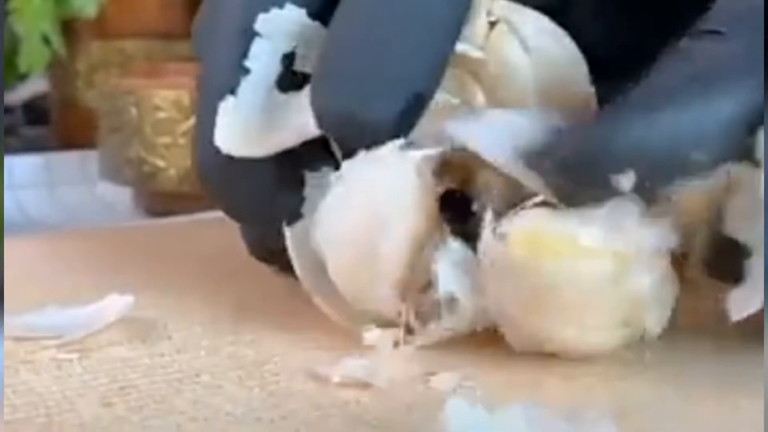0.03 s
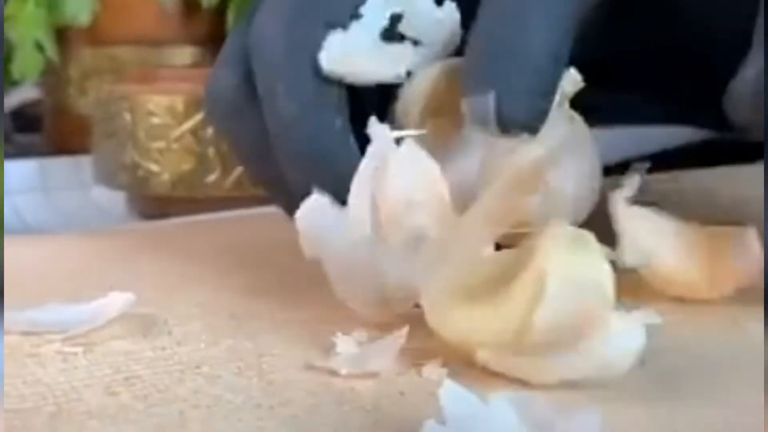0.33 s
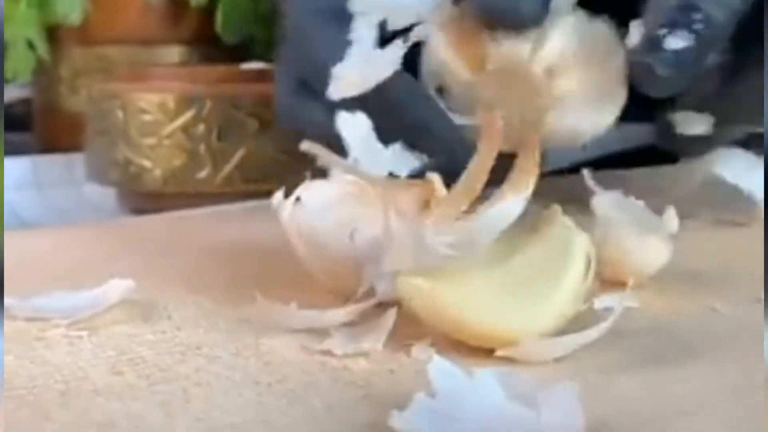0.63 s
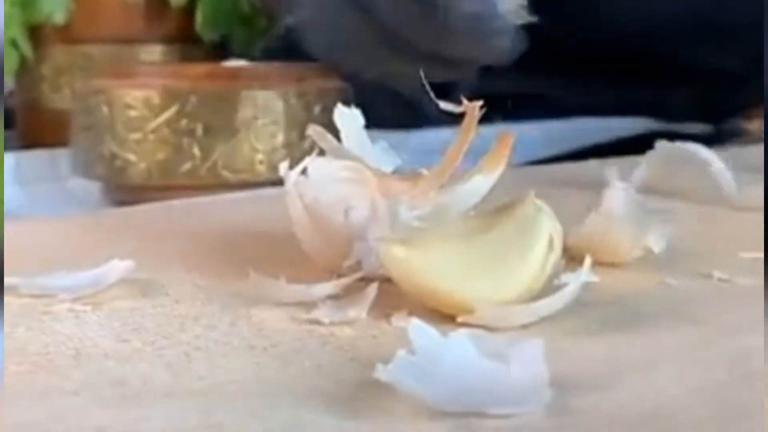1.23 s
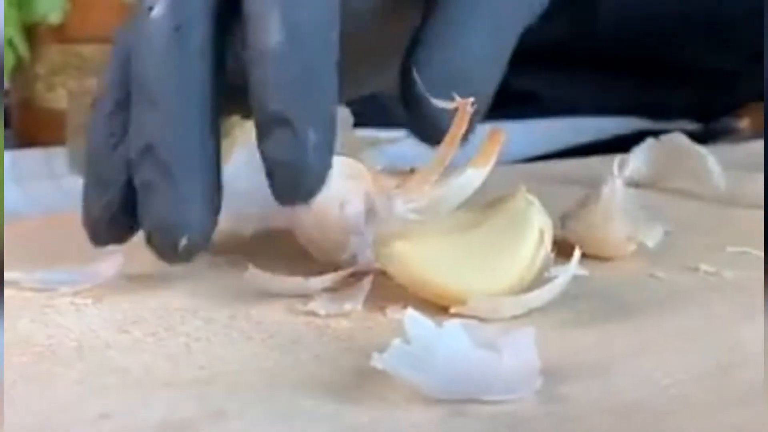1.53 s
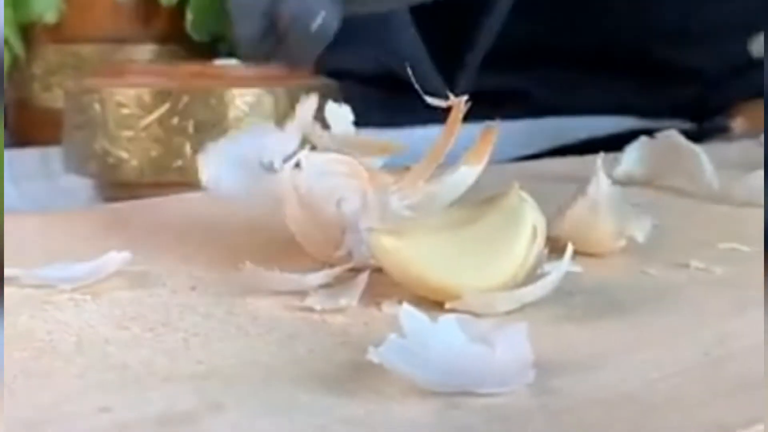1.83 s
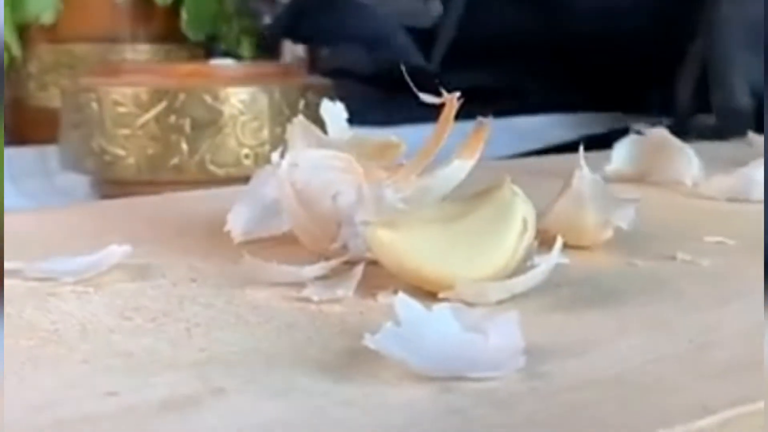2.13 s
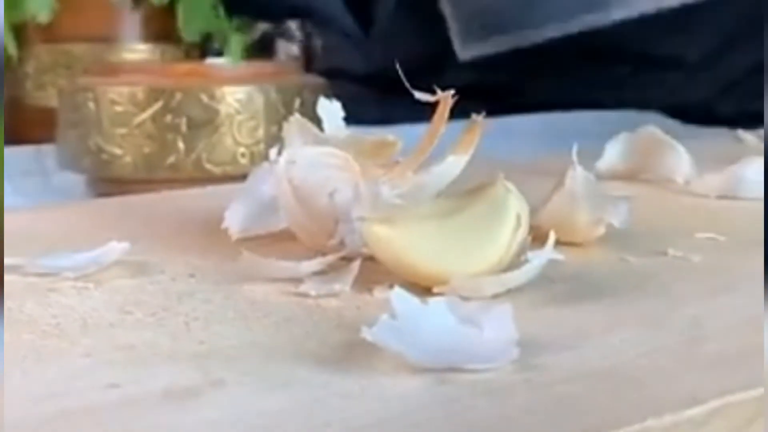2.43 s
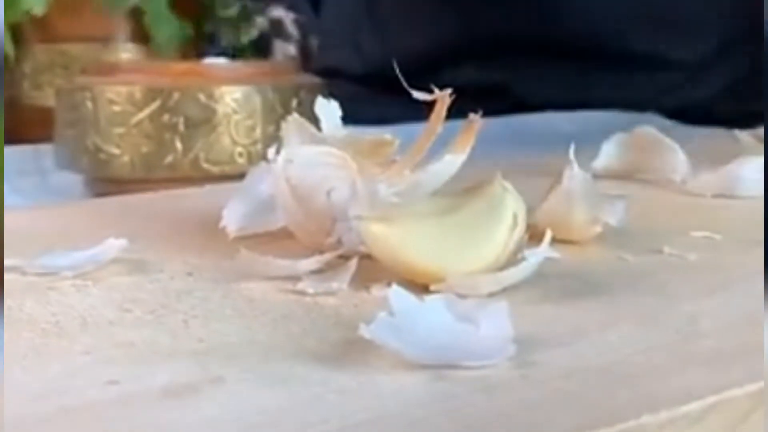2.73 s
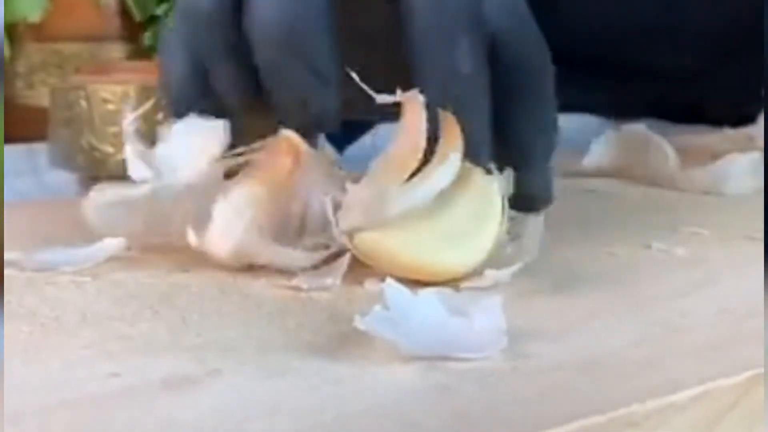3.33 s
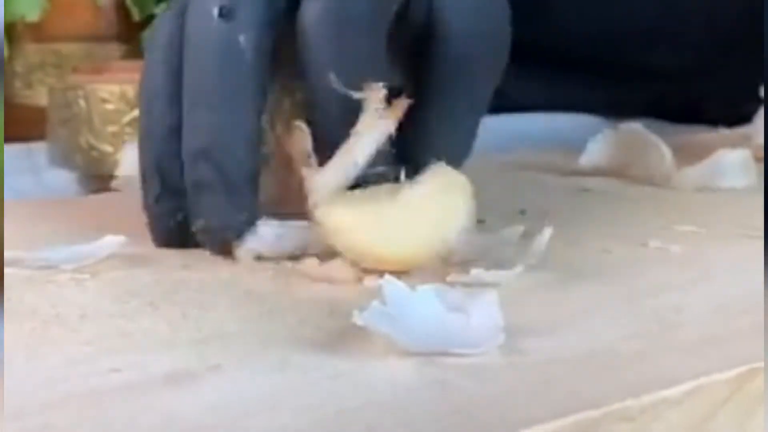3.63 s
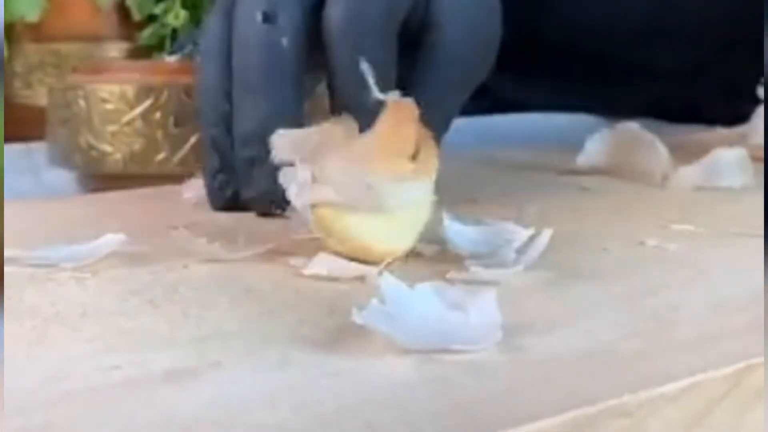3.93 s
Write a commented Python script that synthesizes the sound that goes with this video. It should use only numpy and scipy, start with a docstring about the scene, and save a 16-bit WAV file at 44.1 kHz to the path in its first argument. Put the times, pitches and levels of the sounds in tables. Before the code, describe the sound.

Dry garlic skins crinkle, scrape and crack close up as gloved hands pull cloves apart for the first 1.2 seconds. A clove knocks on the wooden board around 0.25 seconds, among soft hand bumps. Faint rustles follow, with two light taps at about 2.2 and 2.5 seconds. Crinkling returns from 3.2 seconds, peaking near 3.8 with sharp snaps and a soft bump. Low rumble and electrical hum continue throughout.

```python
"""Kitchen, close to a wooden board: gloved hands pull garlic cloves apart.
Each finger move crinkles and scrapes the dry skins; now and then a skin cracks and its flake rings.
The hands bump the board, a loose clove knocks on it and two light taps follow.
Low rumble and mains hum run underneath."""
import sys
import numpy as np
from scipy import signal
from scipy.fft import rfft, irfft, next_fast_len
from scipy.io import wavfile
from scipy.ndimage import map_coordinates

SR = 44100
rng = np.random.default_rng(int(sys.argv[2]) if len(sys.argv) > 2 else 0)


def int16_out(signal):
    """Quantize to a 16-bit WAV file."""
    q = np.round(np.clip(np.atleast_2d(signal).T, -1, 1) * 32767)
    wavfile.write(sys.argv[1], SR, q.astype(np.int16))


N = 176400


def rustle():
    """Each finger move swells and fades, crinkling the skins and scraping glove on clove."""
    # finger moves: centre t/s, length/s, crinkle level/dB, scrape level/dB, treble lift/dB
    moves = [(.008, 0.032, -40, -41, 5.5), (0.066, 0.034, -38.5, -45.5, -5), (0.154, 0.15, -45, -50, 4.5),
             (0.201, 0.023, -41, -49, 1), (0.214, 0.015, -46, -41.5, 1), (0.261, 0.028, -39.5, -41.5, 5),
             (0.288, 0.018, -37, -44, 4), (0.339, 0.055, -39, -42.5, 4), (0.387, 0.035, -36, -46, -1),
             (0.455, .022, -38, -41, 4), (0.477, 0.04, -40, -58, -4), (0.536, 0.036, -42, -49.5, 1),
             (0.639, 0.06, -49.5, -52.5, 5), (0.749, 0.029, -44, -57, -5), (0.795, 0.017, -42.5, -59, 3),
             (0.827, 0.0062, -44, -51, 0), (0.875, 0.018, -28.5, -52, 8.5), (0.938, 0.05, -36, -44.5, 3),
             (1.006, 0.031, -38, -50, 7.5), (1.067, 0.031, -36.5, -54, 3), (1.132, 0.043, -49.5, -67, -1),
             (1.23, 0.079, -55, -58.5, 2), (1.418, 0.04, -52.5, -66, -4), (1.493, 0.022, -43, -54, -8),
             (1.576, 0.023, -62, -67, -3), (1.615, 0.021, -55, -61, -2), (1.933, 0.18, -62.5, -61, -2),
             (2.14, 0.069, -54.5, -60, -9), (2.745, 0.062, -50, -71, -5), (3.214, 0.046, -45, -54, -1),
             (3.322, 0.059, -38.5, -50, 5.5), (3.47, 0.036, -53.5, -58, 8), (3.53, 0.11, -48.5, -68, -4),
             (3.656, 0.021, -35.5, -46.5, 3), (3.699, 0.019, -36, -56, 1), (3.725, 0.026, -31, -45.5, 2),
             (3.744, .008, -39, -36, 0), (3.753, 0.019, -30.5, -39, 0), (3.78, 0.0095, -32.5, -50, -1),
             (3.802, 0.0071, -33.5, -39.5, 6), (3.838, 0.05, -39, -51, 5.5), (3.894, 0.028, -38.5, -55, 2),
             (3.998, 0.071, -37, -50, -5)]
    # dry skin spectrum: f/Hz, density/dB
    skin_spectrum = [(1000, -26), (2100, -9.5), (2700, -9.5), (3500, -9), (4200, -5), (5300, -3),
                     (6400, -1), (8400, 0.5), (9600, 3.5), (10600, 2), (11600, -4), (13000, -2),
                     (15200, -2.5), (16500, 6)]
    # scrape spectrum: f/Hz, density/dB
    scrape_spectrum = [(250, -4), (700, -9), (1300, 0), (1700, 0), (2150, 0.5), (2650, 0), (3100, -1.5),
                       (3600, -0.5), (6000, -2), (12000, -16.5)]
    slide_share, shelf_hz, shelf_width_hz = 0.62, 10900, 2900
    buckling = unit(colour(creases(), skin_spectrum))
    crinkle = np.sqrt(1 - slide_share) * buckling + np.sqrt(slide_share) * noise(skin_spectrum)
    # resonances shift as the skins bend
    crinkle, scrape = [shimmer(x, patch_hz=267.6, patch_s=0.02, depth_db=4)
                       for x in (crinkle, noise(scrape_spectrum))]
    shelf = 0.5 + 0.5 * np.tanh((np.fft.rfftfreq(N, 1 / SR) - shelf_hz) / shelf_width_hz)
    treble = irfft(rfft(crinkle) * shelf, N)
    t, power = clock(), np.zeros((3, N))
    for centre_s, length_s, crinkle_db, scrape_db, lift_db in moves:
        near = np.abs(t - centre_s) < 2 * length_s
        swell = 0.5 ** (np.abs(2 * (t[near] - centre_s) / length_s) ** 1.76)  # roughly a bell
        power[:, near] += amp([[crinkle_db], [crinkle_db + lift_db], [scrape_db]]) ** 2 * swell
    flutter = unit(amp(1.5 * wobble(rate_hz=170)))
    return (np.sqrt(power) * [crinkle - treble, treble, scrape]).sum(0) * flutter


def creases(count=20000, size=128):
    """Tiny creases buckle at random, each ringing a few cycles at its own pitch."""
    rate_hz, centre_hz, spread_octaves, spread_db, t60_cycles = 4500, 7700, 0.63, 3, 5.6
    gap, strength = rng.exponential(size=(2, count))
    hz = np.clip(centre_hz * 2 ** (spread_octaves * rng.standard_normal(count)), SR / 40, SR / 2.5)
    start = (np.cumsum(gap) * SR / rate_hz).astype(int)
    cycles = hz[:, None] * np.arange(size) / SR
    gain = amp(spread_db * np.minimum(strength, 4.5))
    rings = gain[:, None] * np.sin(2 * np.pi * cycles) * decay(cycles, t60_cycles)
    return np.bincount((start[:, None] + np.arange(size)).ravel(), rings.ravel(), N)[:N]


def snaps():
    """A brief crack runs through a skin and rings the flake."""
    # skin cracks: t/s, level before trim/dB, flake f/Hz, length/ms
    cracks = [(0.0634, -29, 8260, 1.8), (0.2786, -17, 8400, 1.7), (0.279, -22, 2400, 1.4),
              (0.2822, -26, 9600, 1.9), (0.402, -21, 9800, 0.99), (0.4024, -20.5, 4650, 1.1),
              (0.457, -21, 9700, 1), (0.46, -11.5, 9500, 2), (0.4623, -18, 6400, 0.5),
              (.514, -31, 9700, 1.5), (0.653, -35, 6000, 1.1), (.7355, -36, 10400, 1),
              (.792, -29.5, 5440, 0.84), (.8242, -15, 10500, 0.65), (0.8478, -15.5, 5600, 1.3),
              (0.869, -11.5, 9400, 1.2), (0.875, -20, 9600, 2.6), (.888, -17.5, 9200, 1.2),
              (0.9426, -16.5, 8900, 1.2), (0.9451, -12.5, 4800, 0.27), (0.9875, -28, 10300, 1),
              (1.032, -32, 9500, 0.92), (1.109, -29, 12500, 1.7), (1.153, -37, 9000, 1.1),
              (1.4695, -35, 9700, 1.9), (1.5507, -29.5, 6800, 0.9), (1.553, -31, 10600, 2.1),
              (1.579, -34.5, 8000, 0.74), (1.988, -38, 7900, 1), (2.753, -35, 14500, 2.7),
              (2.86, -43.5, 9500, 3.2), (3.182, -36, 3100, 2.5), (3.2126, -28, 9500, 0.85),
              (3.2918, -29, 9200, 1.2), (3.747, -17.5, 9400, 1.2), (3.7988, -30, 6800, .9),
              (3.8046, -17, 13700, 1.1), (3.8062, -25, 13000, 1.3), (3.8850, -25, 9250, 1.3),
              (3.8855, -34, 2580, 1.3), (3.9725, -37, 5460, 0.88)]
    # crack spectrum: f/Hz, density/dB
    crack_spectrum = [(500, -23), (2000, -3), (3200, -4.5), (4300, -1.5), (6000, 5), (8000, -0.5),
                      (9700, 3), (12000, -3.5), (16000, -3.5)]
    trim_db, flake_q, flake_share = -5.5, 8.1, 0.46
    out, t = np.zeros(N), np.arange(1024) / SR
    for start_s, db, flake_hz, length_ms in cracks:
        age = t * 1000 / length_ms
        envelope = np.sqrt(age) * np.exp(-2 * age)
        envelope /= envelope.max()
        crack = unit(colour(envelope * rng.standard_normal(len(t)), crack_spectrum))
        ring = unit(signal.lfilter(*signal.iirpeak(flake_hz, flake_q, SR), crack))
        snap = unit((1 - flake_share) * crack + flake_share * ring)
        add(out, start_s, amp(db + trim_db) * np.sqrt(np.mean(envelope ** 2)) * snap)
    return out


def board():
    """Hands bump the board softly; a rocking clove knocks and the wood answers."""
    # hand bumps: t/s, level/dB
    bumps = [(0.111, -28), (.62, -26.5), (3.737, -28)]
    # clove knocks: t/s, level/dB
    knocks = [(0.2177, -23.5), (0.24, -21.5), (0.2726, -26.5)]
    # board response: f/Hz, density/dB
    wood_spectrum = [(200, -22), (600, 4), (1100, 1), (1600, -8), (2200, -13), (4000, -28)]
    out = np.zeros(N)
    for start_s, db in bumps:
        add(out, start_s, amp(db) * thud(hz=150, rise_s=0.0094))
    for start_s, db in knocks:
        add(out, start_s, amp(db) * thud(hz=1000, rise_s=0.0008))
        add(out, start_s, amp(db - 14) * puff(wood_spectrum, t60_s=0.12))
    return out


def taps():
    """Light taps ring a few damped modes, with a faint rasp."""
    # taps: t/s, level/dB
    hits = [(2.206, -35), (2.4627, -36.5)]
    # ringing modes: f/Hz, relative level/dB, t60/s
    modes = [(1524, -5, 0.081), (1740, 0, 0.022), (2100, -7, .06), (2160, -10, 0.028), (2750, -11, .06),
             (3490, -23, 0.034)]
    # rasp spectrum: f/Hz, density/dB
    rasp_spectrum = [(600, -4), (1500, 1), (2100, -9), (2900, -5.5), (3800, -19), (9000, -27)]
    scatter_db, rise_s = 1.7, 0.0003
    out, t = np.zeros(N), np.arange(SR // 5) / SR
    for start_s, db in hits:
        ring = np.zeros(len(t))
        for hz, mode_db, t60_s in modes:
            gain = amp(mode_db + rng.normal(0, scatter_db))
            ring += gain * decay(t, t60_s) * np.sin(2 * np.pi * (hz * t + rng.random()))
        ring *= 1 - np.exp(-t / rise_s)
        rasp = amp(-12) * puff(rasp_spectrum, t60_s=0.25)
        add(out, start_s, amp(db) * (ring / np.abs(ring).max() + rasp))
    return out


def thud(hz, rise_s):
    """Soft contact: a few cycles swell and die."""
    t = np.arange(SR // 5) / SR
    return (t / rise_s / 2) ** 2 * np.exp(2 - t / rise_s) * np.sin(2 * np.pi * hz * t)


def puff(spectrum, t60_s):
    """Decaying burst of coloured noise."""
    t = np.arange(SR // 5) / SR
    return unit(colour(rng.standard_normal(len(t)), spectrum)) * decay(t, t60_s)


def reflections(x, count=8, latest_s=0.009):
    """Quick echoes off the board and nearby pots."""
    delays = (rng.uniform(0.1, 1, count) * latest_s * SR).astype(int)
    return sum(np.pad(x, (delay, 0))[:N] for delay in delays) / np.sqrt(count)


def room(x, t60_s=0.5, rise_s=0.0024):
    """Short diffuse tail of the kitchen."""
    t = np.arange(SR // 3) / SR
    tail = rng.standard_normal(len(t)) * decay(t, t60_s) * (1 - np.exp(-t / rise_s))
    return signal.fftconvolve(x, tail / np.linalg.norm(tail))[:N]


def rumble():
    """Low kitchen noise, drifting and shimmering slightly."""
    # background spectrum: f/Hz, density/dB
    air_spectrum = [(20, -13), (35, 0), (52, 1.5), (80, 0), (120, -1), (158, 3), (210, -0.5), (300, -6),
                    (400, -10.5), (510, -16.5), (680, -12), (1000, -18.5), (1600, -29), (3000, -35.5),
                    (6000, -42.5), (10000, -43.5), (12000, -55), (16000, -52)]
    level_db, drift_db = -34.5, 0.49
    gain = amp(level_db - drift_db * wobble(rate_hz=2.8))
    return gain * shimmer(noise(air_spectrum), patch_hz=202.5, patch_s=0.07, depth_db=1.5)


def hum():
    """Four mains lines waver in level and phase."""
    # mains lines: f/Hz, base rms level/dB
    lines = [(59.2, -43), (119.7, -39), (240.3, -43.5), (360.5, -55)]
    # level offsets: t/s, lowest line/dB, second line/dB, upper two lines/dB
    swells = [(0, -5, -5, -5), (.22, 6.5, -16, 2), (.5, 2, -6, -8), (.72, 6, 1, -2), (1.0, 6, 6, 1.5),
              (1.23, -3, -2, -0.5), (1.45, -3, 4.5, 3), (1.7, 9.5, 2, 1.5), (1.95, 2, -0.5, 1),
              (2.14, 6, 5.5, 5.5), (2.3, -5, -9, 2), (2.48, -2, 6, 0.5), (2.7, -2, -6.5, 5),
              (2.9, 3, -7, 4), (3.18, -3, -4, 3.5), (3.4, -14, -3.5, -2.5), (3.7, 3, -2.5, -4),
              (4, 2, 2, 0.5)]
    waver_db, wander_rad = 1.8, 0.49
    knots_s, lowest_db, second_db, upper_db = np.transpose(swells)
    out, t = np.zeros(N), clock()
    for (hz, db), swell_db in zip(lines, [lowest_db, second_db, upper_db, upper_db]):
        waver = amp(waver_db * wobble(rate_hz=3.96))
        tone = np.sin(2 * np.pi * hz * t + wander_rad * wobble(rate_hz=6))
        out += amp(db + np.interp(t, knots_s, swell_db)) * unit(waver * tone)
    return out


def shimmer(x, patch_hz, patch_s, depth_db, size=512):
    """Random patches of gain over time and frequency; rms 1."""
    hz, t, spectra = signal.stft(x, SR, nperseg=size)
    grid = np.meshgrid(hz / patch_hz, t / patch_s, indexing="ij")
    field = map_coordinates(rng.standard_normal((size, size)), grid, mode="wrap")
    return unit(signal.istft(spectra * amp(depth_db * field), SR, nperseg=size)[1][:N])


def colour(x, spectrum):
    """Filter x by (f/Hz, gain/dB) points on a log axis."""
    size = next_fast_len(len(x) + 2048)
    hz, db = np.transpose(spectrum)
    gain = amp(np.interp(np.log(np.fft.rfftfreq(size, 1 / SR) + 1), np.log(hz), db))
    return irfft(rfft(x, size) * gain, size)[:len(x)]


def noise(spectrum):
    """Coloured noise, rms 1."""
    return unit(colour(rng.standard_normal(N), spectrum))


def wobble(rate_hz):
    """Smooth random curve, rate_hz knots a second."""
    return map_coordinates(rng.standard_normal(4096), [clock() * rate_hz], mode="wrap")


def decay(t, t60):
    """Exponential fall, 60 dB down at t60."""
    return np.exp(-np.log(1000) * t / t60)


def add(track, start_s, sound):
    """Mix a sound in at start_s."""
    part = track[round(start_s * SR):][:len(sound)]
    part += sound[:len(part)]


def amp(db):
    """Decibels to gain."""
    return 10 ** (np.asarray(db) / 20)


def unit(x):
    """Scale to rms 1."""
    return x / np.sqrt(np.mean(x ** 2) + 1e-20)


def clock():
    """Sample times in s."""
    return np.arange(N) / SR


def scene():
    """Close garlic and its reflections over the background; mono."""
    garlic = rustle() + snaps() + board() + taps()
    return (garlic + amp(-15) * reflections(garlic) + amp(-34) * room(garlic) + rumble() + hum())[None]


def record(dry):
    """Brick-wall low-pass."""
    top_hz, size = 15650, next_fast_len(N + 8192)
    passband = np.fft.rfftfreq(size, 1 / SR) < top_hz
    return irfft(rfft(dry, size) * passband, size)[:, :N]


dry = scene()
out = record(dry)
int16_out(out)
```